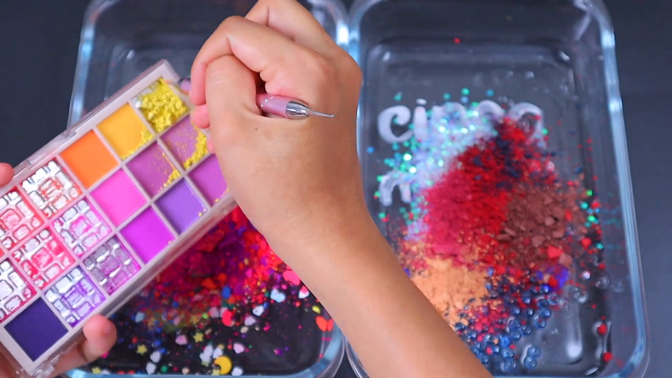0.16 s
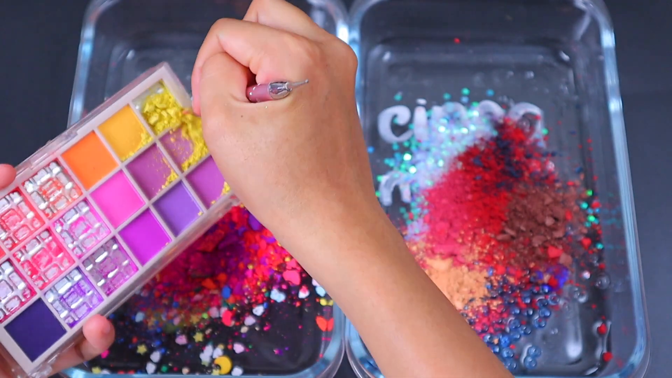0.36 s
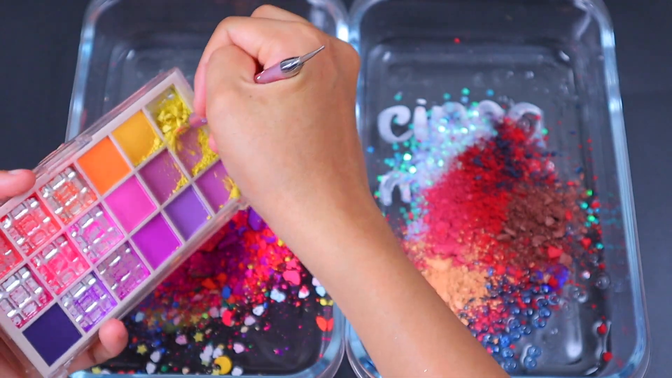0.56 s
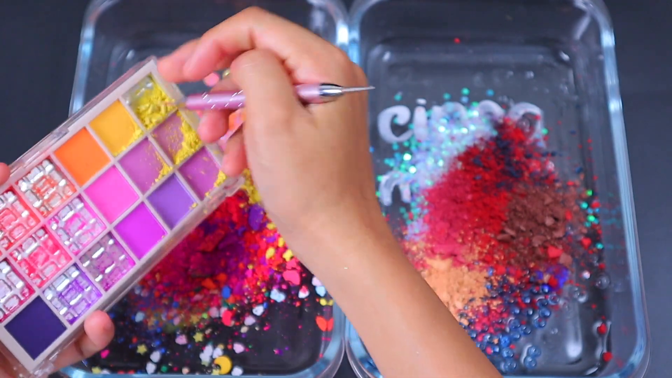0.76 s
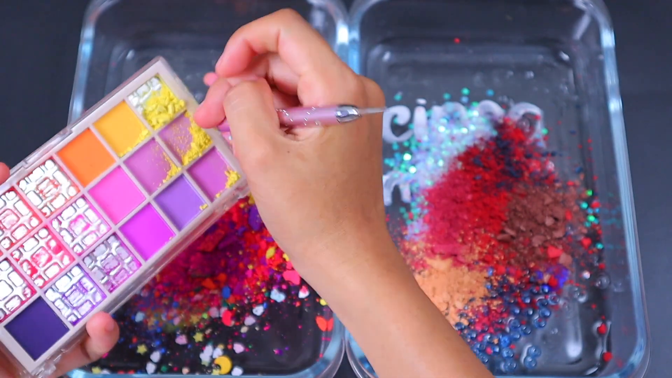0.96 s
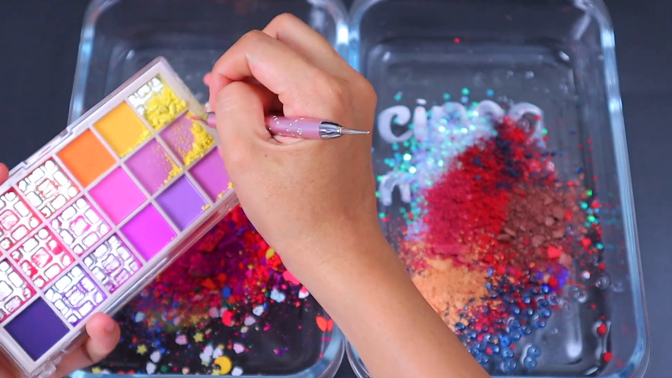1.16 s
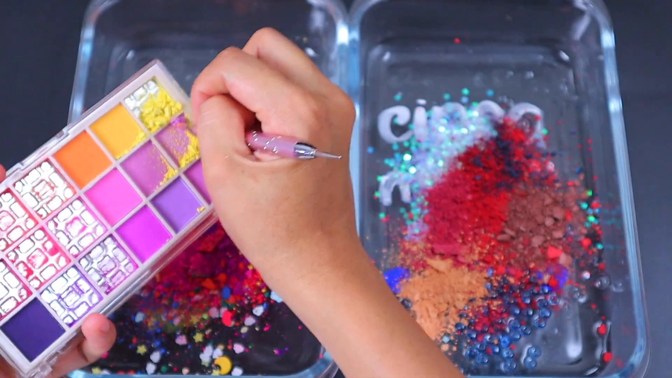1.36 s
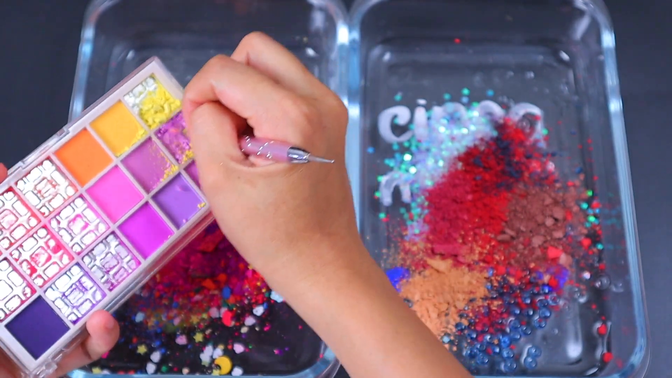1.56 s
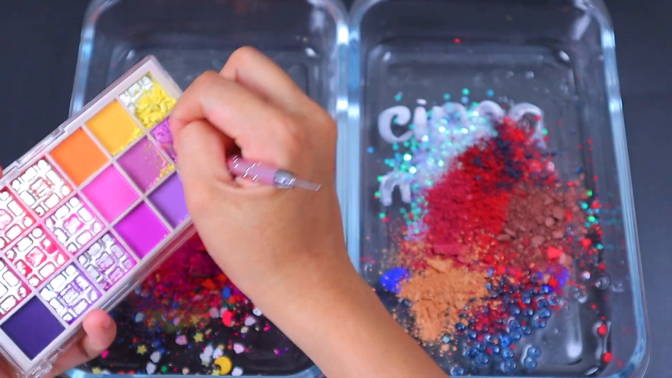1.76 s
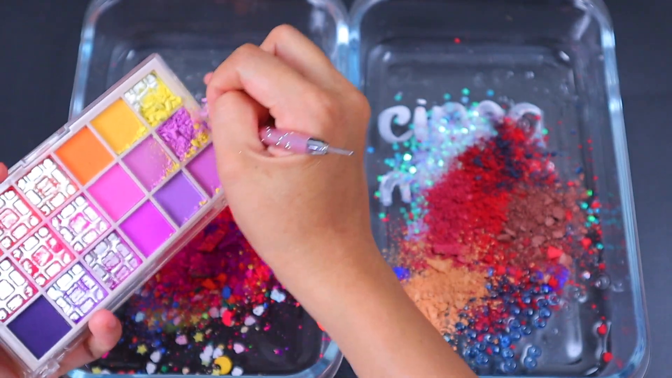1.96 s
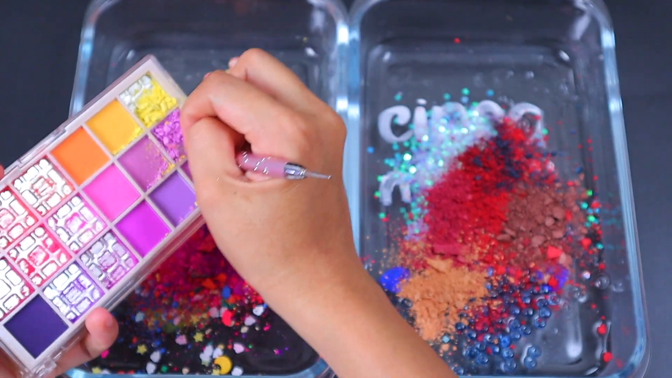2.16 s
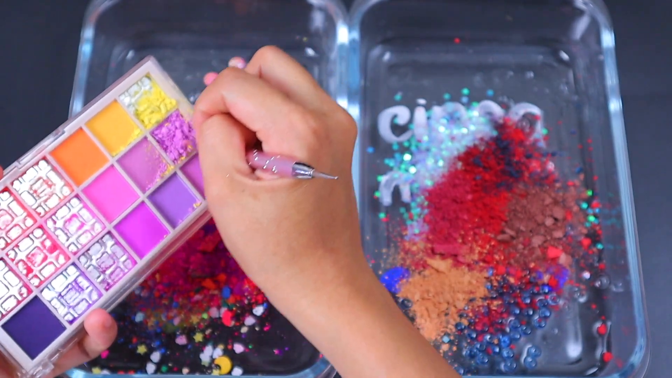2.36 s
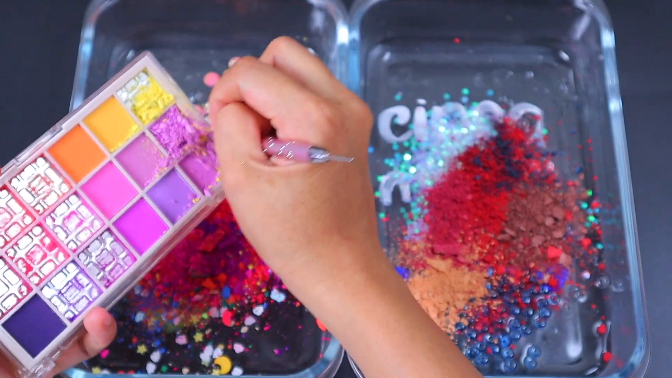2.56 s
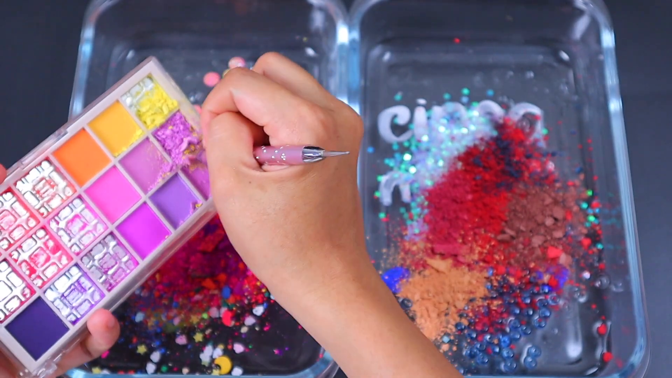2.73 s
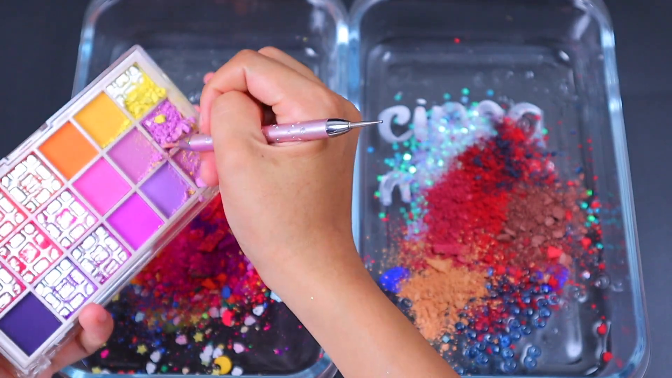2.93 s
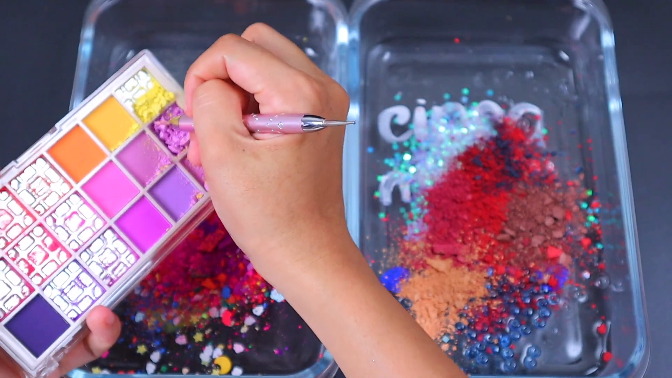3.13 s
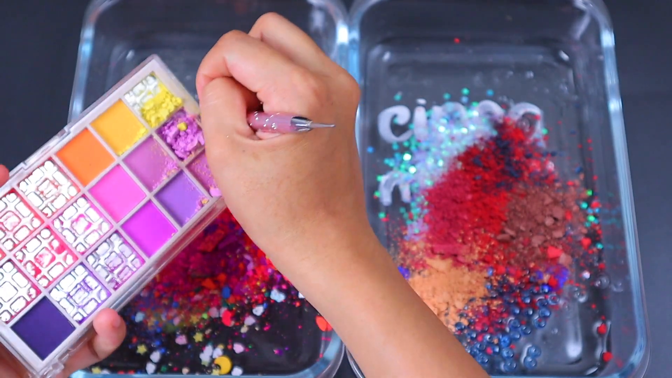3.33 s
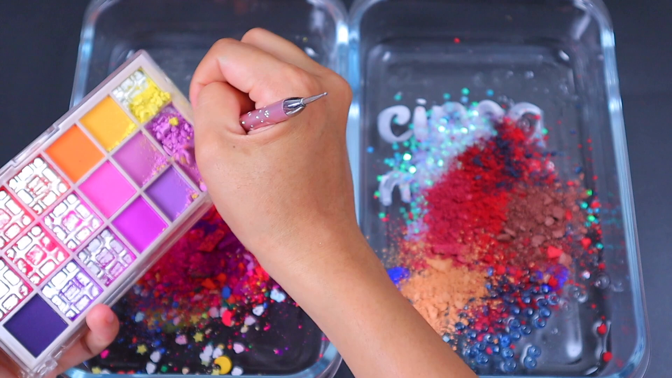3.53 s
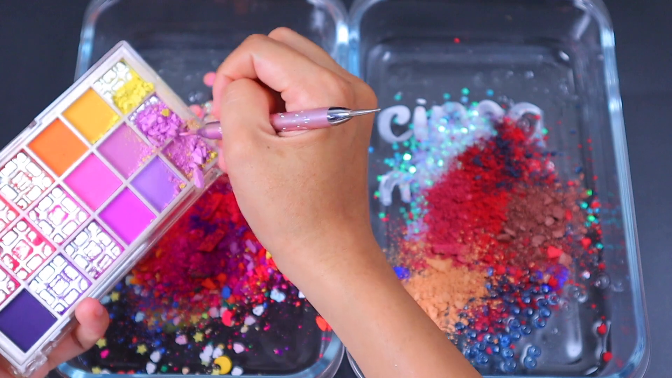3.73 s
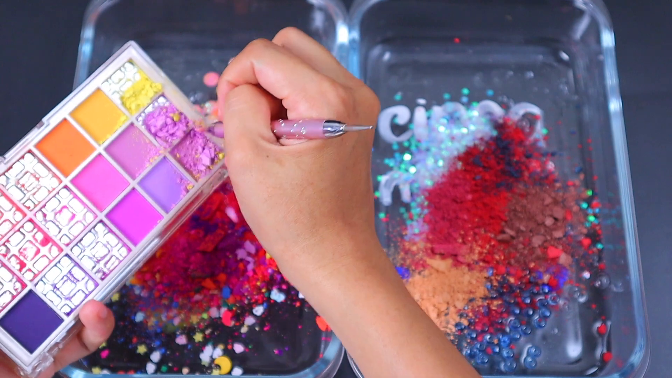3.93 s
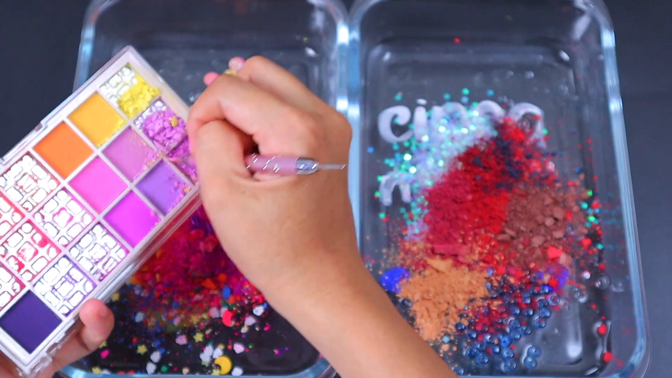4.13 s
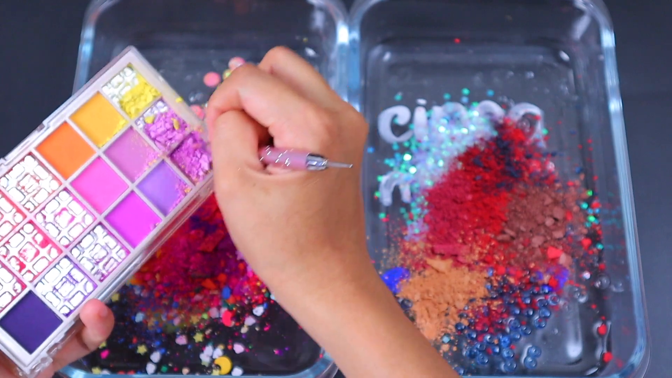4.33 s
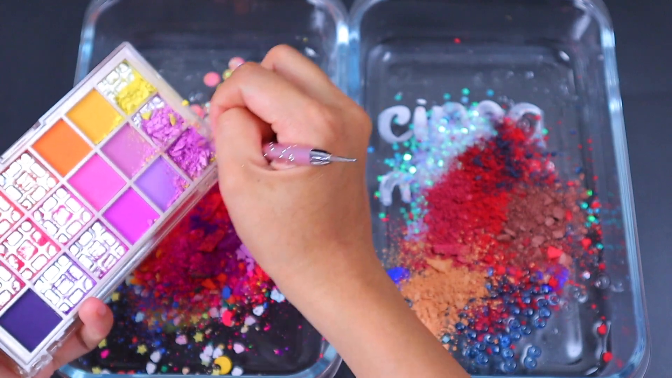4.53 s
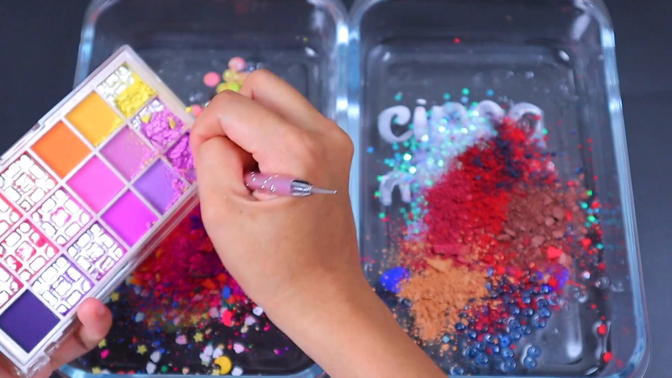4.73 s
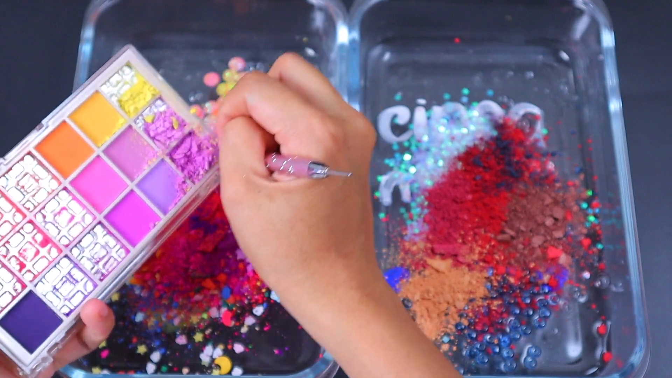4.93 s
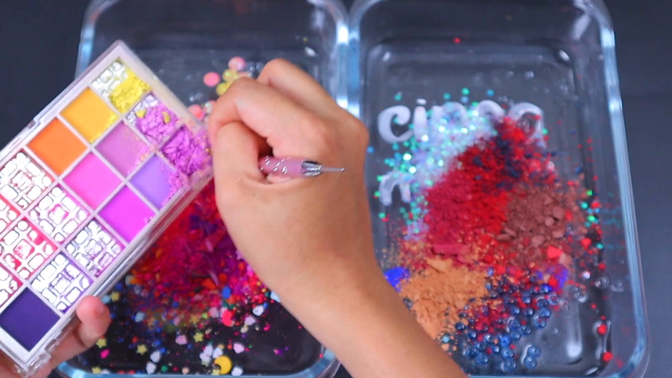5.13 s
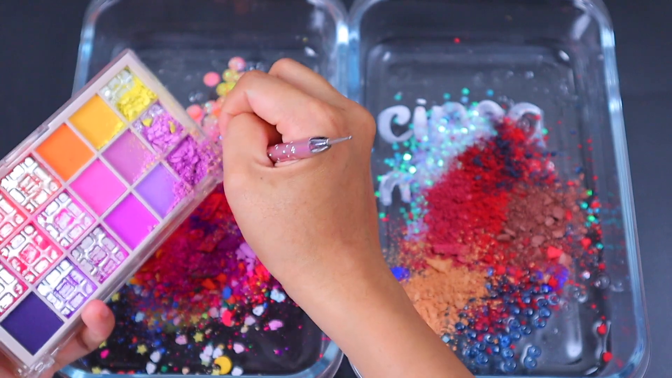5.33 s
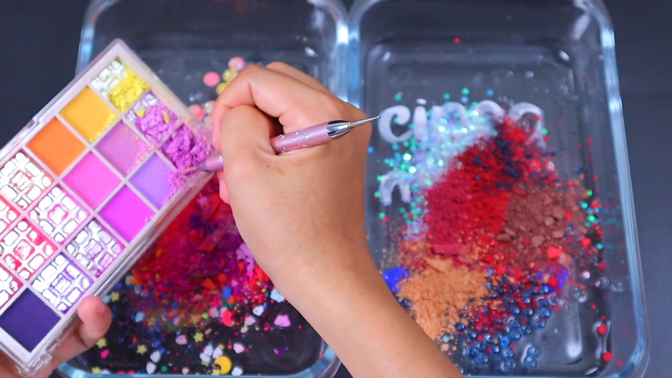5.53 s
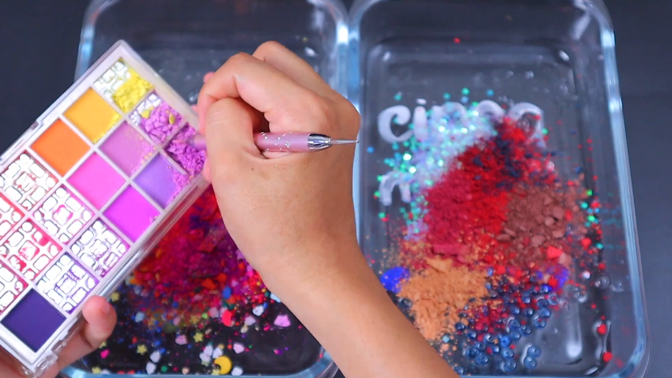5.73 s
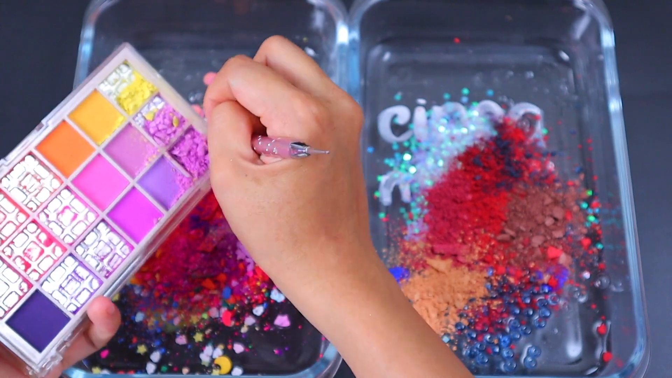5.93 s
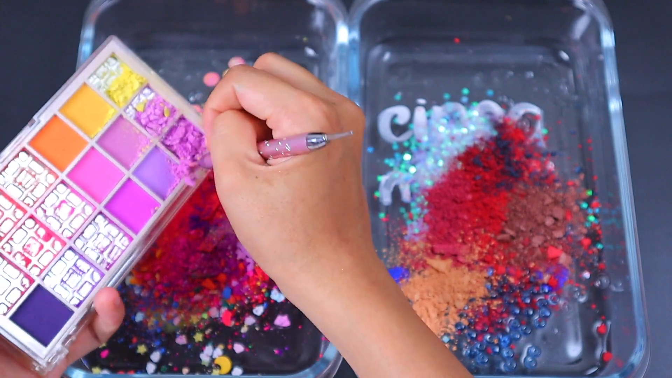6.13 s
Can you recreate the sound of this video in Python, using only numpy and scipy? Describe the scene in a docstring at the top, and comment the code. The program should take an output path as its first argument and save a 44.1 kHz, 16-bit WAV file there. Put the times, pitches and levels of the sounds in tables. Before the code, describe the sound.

Very close stereo sound in a small, quiet room with low rumble and soft steady hiss. From 0 to 0.8 s a metal tip makes about seven quick, uneven scratches in a nearly empty pan, fuller and hollow, with a snap and dull knock near 0.36 s and a firm scrape near 0.58 s. A pause follows, broken by a small knock at 1.28 s. From 1.4 s the tool digs fresh pressed powder: gritty crunches, hardest from 1.6 to 2.0 s with sharp cracks at 1.65 and 1.95 s. Lighter scrapes continue at five or six a second until 3.67 s, crumbs snapping, fine dust hissing, the hand thudding softly. After a short gap, regular strokes resume at 4.04 s, with a low knock at 4.92 s, a strong crack and knock at 5.67 s, another crack at 6.05 s, and bright scratching at the end.

```python
"""Short gritty scrapes, five or six a second with some pauses, sharp cracks, dull knocks and soft thuds.
A pointed metal tool digs pressed powder out of a hand-held plastic palette: each stroke crushes a stream
of tiny grains and snaps off larger crumbs, made of random clicks that ring the pan and the case.
Shaped noise makes the hiss of dust and the shudder of the hand; short damped tones make the knocks.
Two close microphones hear it in a small, quiet room with a low rumble and an even hiss."""
import sys
import numpy as np
from scipy import signal
from scipy.fft import rfft, irfft, next_fast_len
from scipy.io import wavfile

SR = 44100
rng = np.random.default_rng(int(sys.argv[2]) if len(sys.argv) > 2 else 0)


def to_wav(sig):
    """Store sig (one row per channel, or 1-D mono) as 16-bit WAV at the path in sys.argv[1].

    Samples outside -1..1 are clipped; the rate is SR.
    """
    pcm = np.clip(np.atleast_2d(sig), -1, 1) * 32767
    pcm = np.round(pcm).astype(np.int16)
    wavfile.write(sys.argv[1], SR, pcm.T)  # frames by channels


N = 272979
TIME = np.arange(N) / SR
SIZE = next_fast_len(N + SR // 2, real=True)  # padded, so that filter tails do not wrap round
FREQ = np.maximum(np.arange(SIZE // 2 + 1) * SR / SIZE, 1)

# strokes of the tool, with relative levels: (touch [s], powder gives way [s], lift [s],
# push level [dB], brightness [dB], thud level [dB])
STROKES = [(-.02, -0.003, .03, -43, -4.5, -49), (0.072, 0.113, .19, -49.5, -1, -53.5),
           (0.247, 0.291, .295, -50, 3, -52), (0.352, 0.37, .405, -36, -4.5, -39.5),
           (0.547, 0.584, .63, -35, -9, -49), (.64, 0.657, .675, -46, -6, -45),
           (0.755, 0.758, .79, -55.5, 5.5, -61), (1.394, 1.458, 1.525, -47, -4, -46.5),
           (1.591, 1.661, 1.69, -28.5, -5.5, -47.5), (1.752, 1.778, 1.843, -31.5, -7.5, -43),
           (1.896, 1.971, 1.995, -27.5, -10, -46), (2.053, 2.102, 2.172, -45, -3.5, -40.5),
           (2.214, 2.267, 2.325, -40.5, -7, -47), (2.365, 2.436, 2.505, -43.5, -4, -45),
           (2.541, 2.587, 2.635, -37.5, -8.5, -41), (2.7, 2.769, 2.848, -43, -4, -43.5),
           (2.939, 3.03, 3.112, -46, -8, -49.5), (3.161, 3.267, 3.31, -40.5, -4, -50.5),
           (3.374, 3.409, 3.485, -47.5, -2, -44), (3.513, 3.585, 3.665, -42, -4.5, -52.5),
           (4.039, 4.107, 4.135, -43, -4.5, -43), (4.205, 4.255, 4.30, -36, -6.5, -43.5),
           (4.354, 4.417, 4.475, -42, -5.5, -47.5), (4.517, 4.579, 4.62, -41.5, -6.5, -47),
           (4.675, 4.738, 4.792, -42.5, -4.5, -45), (4.828, 4.858, 4.92, -42.5, -5, -47.5),
           (4.982, 5.042, 5.105, -47.5, -3, -49.5), (5.139, 5.159, 5.235, -52, -3, -49.5),
           (5.347, 5.452, 5.49, -41, -2.5, -47.5), (5.574, 5.65, 5.70, -46, -5, -49),
           (5.74, 5.828, 5.893, -39, -6, -51.5), (5.952, 6.031, 6.085, -47, -4.5, -48),
           (6.1, 6.15, 6.195, -42.5, 4, -49.5)]
STROKE_STARTS = [row[0] for row in STROKES]
NEXT_PAN_S = 1.1  # until then the tool works in the first, nearly empty pan
ATTACK_S = 0.0172  # time the tip takes to make firm contact


def undb(db):
    """Turn decibels into gain."""
    return 10 ** (np.asarray(db) / 20)


def unit(x):
    """Scale to an average strength (rms) of 1."""
    return x / np.sqrt(np.mean(x ** 2))


def across(hz, values):
    """Join points with straight lines on a logarithmic frequency axis."""
    return np.interp(np.log(FREQ), np.log(hz), values)


def response(points, modes=()):
    """How a body answers a blow: a broad slope with resonances, no sound before the blow, unit power."""
    db = across(*np.transpose(points))
    for hz, width, lift in modes:
        db = db + lift / (1 + (2 * (FREQ - hz) / width) ** 2)
    # minimum phase: fold the cepstrum so that the ring starts at once
    cepstrum = irfft(np.log(undb(db)), SIZE)
    phase = rfft(2 * cepstrum[:SIZE // 2], SIZE).imag
    return unit(undb(db)) * np.exp(1j * phase)


def through(x, gain):
    """Pass a sound through a frequency response."""
    return irfft(rfft(x, SIZE) * gain, SIZE)[..., :N]


def add(track, s, sound):
    """Mix a sound into a track at a time in seconds."""
    start = max(int(s * SR), 0)
    part = sound[..., :max(N - start, 0)]
    track[..., start:start + part.shape[-1]] += part


def walk(rate):
    """Random ups and downs of rms 1: random points, `rate` per second, joined by straight lines."""
    knots = np.arange(0, TIME[-1] + 1, 1 / rate)
    return unit(np.interp(TIME, knots, rng.standard_normal(len(knots))))


def grains(rate, spread_db):
    """Tiny fractures as random clicks, `rate` per second, many weak and a few strong."""
    count = int(rate * N / SR)
    chance = rng.random((N, 3))[:count]
    size = undb(-spread_db * np.log(np.maximum(chance[:, 1], .05)))
    position = (chance[:, 0] * N).astype(int)
    return unit(np.bincount(position, size * np.sign(chance[:, 2] - .5), N))


def body_of(s):
    """Low-mid weight [dB] of the latest stroke: the harder the push, the thinner the scrape."""
    usual_db, usual_body_db, empty_body_db = -44.5, -6.5, 4
    thinning = 0.47  # dB of body lost per dB of push
    row = STROKES[max(np.searchsorted(STROKE_STARTS, s, side="right") - 1, 0)]
    return usual_body_db - thinning * (row[3] - usual_db) + empty_body_db * (s < NEXT_PAN_S)


def pressure(contact_db=-16, edge_s=0.0049):
    """The push builds until the powder gives, then eases; returns drive as body, middle and brightness."""
    build_db_per_s, ease_db_per_s, release_s = 164, 114, 0.018
    drive = np.zeros((3, N))
    for touch, give, lift, level_db, bright_db, _ in STROKES:
        first = max(int((touch - edge_s) * SR), 0)
        t = TIME[first:int((lift + edge_s) * SR)]
        building = build_db_per_s * np.maximum(give - t, 0)
        easing = ease_db_per_s * np.maximum(t - give, 0)
        push_db = level_db - building - easing
        # contact is loose near touch and lift
        loose = np.maximum(1 - (t - touch) / ATTACK_S, 0)
        loose = loose + np.maximum(1 - (lift - t) / release_s, 0)
        colour = undb([body_of(touch), 0, bright_db])
        add(drive, t[0], colour[:, None] * undb(push_db + contact_db * loose))
    return drive


def scraping(drive, snaps, grind_db=-.5, slip_db=2.5, fleck_db=3.0, body_db=8, bright_db=4.0):
    """Stick-slip grinding and snaps set how strongly tiny fractures strike and ring pan and palette."""
    # centres of the pitch ranges in which grains crackle: plain list [Hz]
    grain_hz = [1000, 1750, 2900, 4800, 8500]
    # broad response of the palette: (frequency [Hz], level [dB])
    palette_slope = [(100, -10.5), (220, -7.5), (500, -8.5), (950, -6.5), (1500, -1), (2100, 1), (3100, 0),
                     (4000, -2), (6300, -8.5), (8500, -10), (10500, -16), (12500, -37), (15500, -48)]
    # resonances of the first, nearly empty pan: (frequency [Hz], width [Hz], lift [dB])
    empty_modes = [(395, 180, 6), (630, 110, 7.5), (1108, 57, 6.5), (1820, 140, 13.5), (2680, 330, -2.5),
                   (3460, 110, 8), (3950, 110, 3.5), (4460, 210, 8), (4860, 260, 10), (5470, 220, 10),
                   (6130, 190, 5), (7660, 250, 5)]
    # resonances of the next pan and the case: (frequency [Hz], width [Hz], lift [dB])
    pan_modes = [(567, 230, 6), (780, 236, 9.5), (1092, 88, 10.5), (1243, 61, 3.5), (1743, 100, 10),
                 (1845, 135, 12.5), (2452, 136, 5), (2798, 240, 6), (3030, 60, 5), (3283, 81, 7.5),
                 (3480, 110, 7), (4610, 70, 6), (5020, 200, 4), (5500, 58, 6.5), (7450, 200, 5.5),
                 (8020, 300, 3.5)]
    grinding = drive * unit(undb(slip_db * walk(300)))
    colour = undb([body_db, 0, bright_db])
    fractures, force = grains(11000, 3.8), 0
    # the lowest range follows the body, the next two the middle, the top two the brightness
    for k, band in zip([0, 1, 1, 2, 2], np.eye(len(grain_hz))):
        # grains differ in size, so each pitch range flares on its own
        flecks = unit(undb(fleck_db * walk(200)))
        grind = undb(grind_db) * grinding[k] * flecks
        strength = colour[k] * np.sqrt(grind ** 2 + snaps[k] ** 2)
        force = force + rfft(fractures * strength, SIZE) * across(grain_hz, band)
    force = rim_echo(irfft(force, SIZE)[:N])
    in_empty_pan = through(force, response(palette_slope, empty_modes))
    in_next_pan = through(force, response(palette_slope, pan_modes))
    return np.where(TIME < NEXT_PAN_S, in_empty_pan, in_next_pan)


def rim_echo(force, echo=0.47, near_s=.0003, far_s=0.00161):
    """The wave comes back from the rim; each stroke has a random delay and sign, so its own colour."""
    chance = rng.random((len(STROKES), 2))
    stroke = np.maximum(np.searchsorted(STROKE_STARTS, TIME) - 1, 0)
    lag = ((near_s + (far_s - near_s) * chance[:, 0]) * SR).astype(int)
    gain = echo * np.sign(chance[:, 1] - .5)
    returned = gain[stroke] * force[np.arange(N) - lag[stroke]]
    return (force + returned) / np.hypot(1, echo)


def cracks(push):
    """Strength of snaps that swell and die in milliseconds; random small crumbs follow the push."""
    # crumbs snapping and the tip catching on the pan, relative: (time [s], level [dB], brightness [dB])
    snap_list = [(0.1167, -41.5, -13), (0.164, -37.5, -3.5), (0.3585, -29.5, 2), (.3895, -42, -5),
                 (.578, -39.5, -4), (0.602, -34.5, -1), (0.6522, -42.5, -13), (1.4848, -35.5, -4),
                 (1.603, -32.5, -28), (1.6467, -19.5, -6.5), (1.8015, -25, -15), (1.8259, -28.5, -10),
                 (1.923, -30.5, -30), (1.9519, -23.5, -20), (1.9649, -21.5, -2), (1.984, -35, 9.5),
                 (2.125, -32.5, -17), (2.1383, -38.5, -10), (2.1585, -37, -15), (2.2532, -34.5, -11),
                 (2.279, -36.5, 1), (2.294, -41, 4), (2.3107, -36, 0.5), (2.4426, -35.5, -5),
                 (2.464, -36, -6), (2.611, -44, 3), (2.6941, -48, 13.5), (2.7772, -29, -11),
                 (2.818, -31.5, -5), (2.833, -34, -7), (2.906, -51.5, -12), (2.989, -40, -9),
                 (3.0217, -28.5, -14.5), (3.067, -39, -22), (3.0957, -35, -4.5), (3.2736, -33.5, -1),
                 (3.4193, -31.5, -2), (3.4651, -37.5, -3.5), (3.5354, -50, -4.5), (3.5876, -34, -8),
                 (3.601, -36, -14), (3.6376, -40, -19), (3.7019, -51.5, -5), (3.945, -57, -14),
                 (4.0684, -40.5, -2), (4.1069, -28.5, -12), (4.221, -30, -24), (4.275, -32, 1),
                 (4.283, -36.5, -3), (4.5443, -33.5, -21), (4.559, -37, -16), (4.601, -46, 1),
                 (4.627, -47, 2.5), (4.843, -34.5, -18), (4.889, -38.5, 3), (5.0334, -42, 1),
                 (5.052, -41, 5.5), (5.0724, -36.5, -6), (5.175, -38, 0.5), (5.2151, -40, -2.5),
                 (5.347, -42.5, -7), (5.4208, -38, -4), (5.629, -32, -26), (5.675, -22, -6.5),
                 (5.868, -29.5, -15), (6.004, -34, -5), (6.054, -24, -8), (6.142, -31.5, -17),
                 (6.166, -43, 6)]
    rise_s, fall_s, crack_body_db = 0.0016, 0.0019, -0.5
    crumbs_per_s, crumb_db, crumb_spread_db, crumb_colour_db = 40, 2, 3.5, 3.5
    drive = np.zeros((3, N))
    lead_s = .01  # room for the swell ahead of the peak
    t = TIME[:SR // 30] - lead_s
    shape = np.exp(-np.abs(t) / np.where(t < 0, rise_s, fall_s))
    for s, db, bright_db in snap_list:
        colour_db = np.array([body_of(s) + crack_body_db, 0, bright_db])
        add(drive, s - lead_s, undb(db + colour_db)[:, None] * shape)
    chance = rng.random((N // 100, 5))[:int(crumbs_per_s * N / SR)]
    spreads = np.sqrt(3) * (2 * chance[:, 1:] - 1)  # even chances with a spread of 1
    for when, spread in zip(chance[:, 0], spreads):
        size_db = crumb_db + crumb_spread_db * spread[0] + crumb_colour_db * spread[1:]
        size = undb(size_db) * push[:, int(when * N)]
        add(drive, when * N / SR - lead_s, size[:, None] * shape)
    return drive


def dust(push, snaps, dust_db=-36.5, growth=0.53, snap_db=-16.5):
    """Fine powder hisses under the tip, growing only slowly with the push, and spits at each snap."""
    # colour of the fine dust under the tip: (frequency [Hz], level [dB])
    dust_colour = [(1500, -26), (5000, 4.5), (9000, -0.5), (12000, 7.5), (15500, -6)]
    strength = undb(dust_db) * push ** growth + undb(snap_db) * snaps
    return strength * through(grains(5000, 3.4), response(dust_colour))


def knocks():
    """The palette knocks dully in the hand: short tones that die away like damped rings of the case."""
    # knocks: (time [s], level [dB], pitch [Hz], time to fall by 60 dB [s])
    knock_list = [(.003, -43, 183, 0.022), (.357, -27.5, 390, 0.014), (.652, -37, 177, 0.063),
                  (1.269, -46.5, 493, 0.11), (1.282, -36, 635, 0.0083), (1.282, -44, 1580, 0.0091),
                  (4.916, -33.5, 140, 0.045), (5.674, -31.5, 630, 0.022), (6.141, -42, 609, 0.018)]
    out, t = np.zeros(N), TIME[:SR // 8]
    for s, db, hz, t60 in knock_list:
        fading = np.exp(-np.log(1000) * t / t60)
        add(out, s, undb(db) * fading * np.sin(2 * np.pi * hz * t))
    return out


def thuds(drag_db=-3, kick_db=-1.5, kick_s=0.0029, let_go_s=0.02658, vary=0.49):
    """The hand shudders more and more in a stroke; a jolt, shorter or longer by chance, ends the push."""
    # broad response of hand and table: (frequency [Hz], level [dB])
    table_slope = [(20, -4), (45, -4.5), (70, -1), (120, -4), (190, -5.5), (280, -21), (600, -43),
                   (2000, -69)]
    # their resonances: (frequency [Hz], width [Hz], lift [dB])
    table_modes = [(64.2, 11.8, 10.9), (92, 7.7, 9.3)]
    shudder, jolts = np.zeros(N), np.zeros(N)
    t = TIME[:SR // 3]
    for stroke, chance in zip(STROKES, rng.standard_normal(len(STROKES))):
        touch, _, lift, *_, thud_db = stroke
        release = max(lift - let_go_s, touch + ATTACK_S)
        # a weak remainder lasts until a third of a second after the touch
        turns = [touch, touch + ATTACK_S, release, release + let_go_s]
        add(shudder, touch, undb(thud_db) * np.interp(touch + t, turns, [0, 0.78, 1.69, 0.12]))
        age = t / (kick_s * np.exp(vary * chance))
        add(jolts, release, undb(thud_db + kick_db) * np.exp(-age) * np.sin(np.pi * age))
    push = undb(drag_db) * shudder * rng.standard_normal(N) + jolts
    return through(push, response(table_slope, table_modes))


def microphones(x, scatter_db=-5, wander_rate=90):
    """The right side hears a weaker, shifted copy plus a delayed, randomly wandering scattered share."""
    # right microphone against the left: (frequency [Hz], drop [dB], phase lag [rad])
    right_side = [(60, 6, 2.9), (130, 2.5, 2.1), (240, 3, 1.1), (400, 3, 0), (700, 3, 0), (1800, 7, .2),
                  (3000, 5.5, 1.05), (4200, 4.5, .65), (5500, 3, .7), (7200, .5, .55), (9000, 0, 1.2),
                  (11000, 0, 2.2), (15000, 0, 2.4)]
    hz, drop_db, lag = np.transpose(right_side)
    right = through(x, undb(-across(hz, drop_db)) * np.exp(-1j * across(hz, lag)))
    delayed = np.roll(right, SR // 2000)  # half a millisecond
    scattered = undb(scatter_db) * walk(wander_rate) * delayed
    return np.array([x, (right + scattered) / np.hypot(1, undb(scatter_db))])


def room(x, wet_db=-25, t60_s=0.43, dull_hz=11000):
    """Walls return a faint, short tail: fading noise, different on each side and duller in the treble."""
    t = TIME[:SR // 3]
    fading = np.exp(-np.log(1000) * t / t60_s)
    tail = rng.standard_normal((2, len(t))) * fading * (t > .004)
    tail /= np.linalg.norm(tail, axis=1, keepdims=True)
    return undb(wet_db) * through(x, rfft(tail, SIZE) / (1 + 1j * FREQ / dull_hz))


def quiet(left_db=-63, right_db=-65, waver_db=0.5):
    """Low room rumble and microphone hiss: coloured noise whose level wavers slightly."""
    # colour of rumble and hiss: (frequency [Hz], level [dB])
    quiet_colour = [(20, -12), (40, -8), (65, -2), (170, -3), (300, -10), (600, -15), (1200, -23.5),
                    (2500, -25), (6000, -29), (15500, -31.5)]
    noise = through(rng.standard_normal((2, N)), response(quiet_colour))
    return undb([left_db, right_db])[:, None] * noise * undb(waver_db * walk(3.26))


def scene(crack_db=0.5):
    """The palette close to the microphones, in its room."""
    drive = pressure()
    snaps = undb(crack_db) * cracks(drive)
    palette = scraping(drive, snaps) + dust(drive[2], snaps[2]) + knocks()
    return microphones(palette + thuds()) + room(palette) + quiet()


def record(dry):
    """A steep low-pass filter removes the treble above about 15.9 kHz."""
    low_pass = signal.ellip(10, .2, 70, 15900, fs=SR, output="sos")
    return signal.sosfilt(low_pass, dry)


dry = scene()
out = record(dry)
to_wav(out)
```